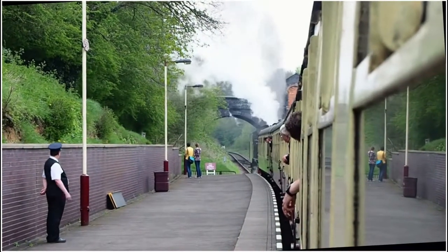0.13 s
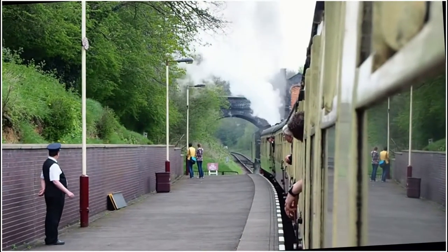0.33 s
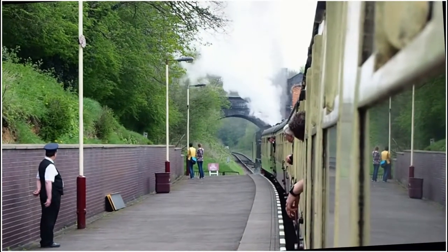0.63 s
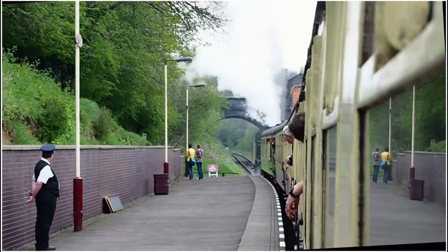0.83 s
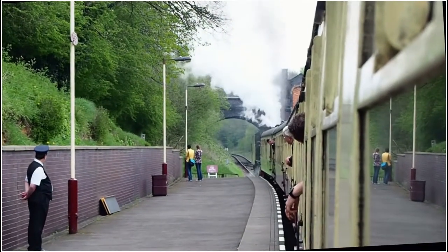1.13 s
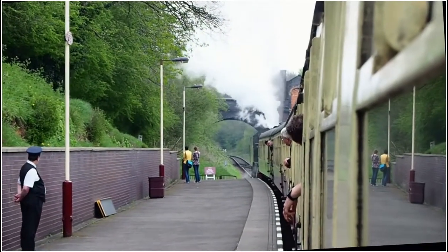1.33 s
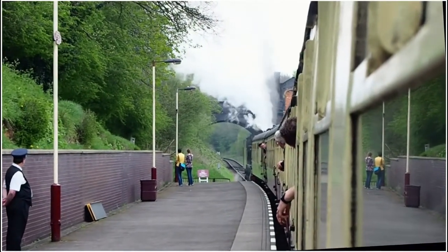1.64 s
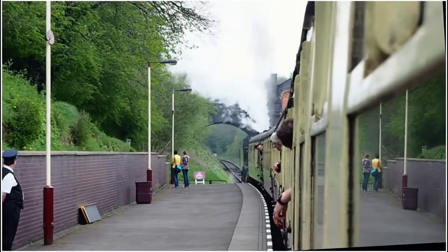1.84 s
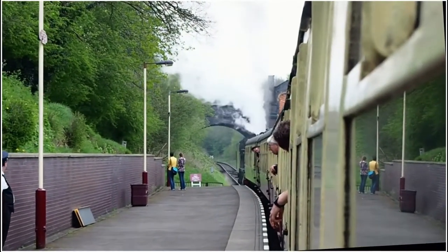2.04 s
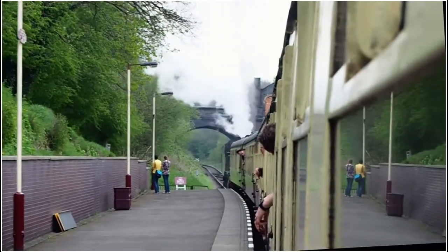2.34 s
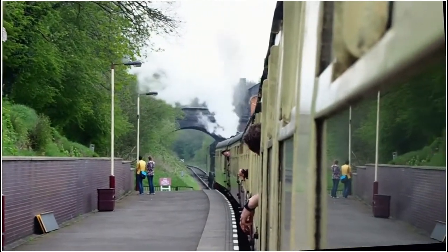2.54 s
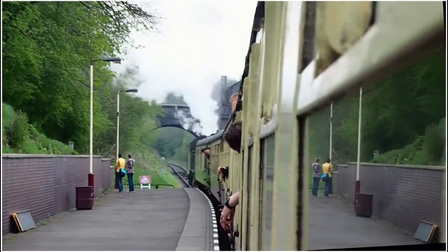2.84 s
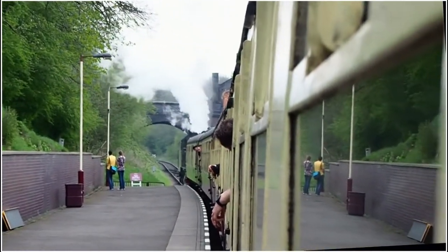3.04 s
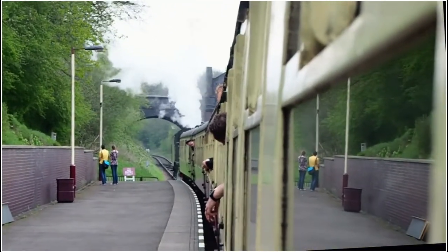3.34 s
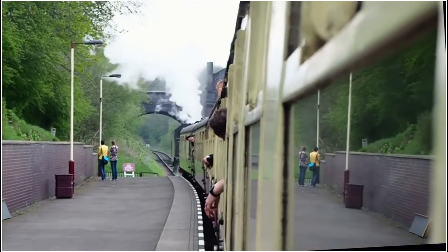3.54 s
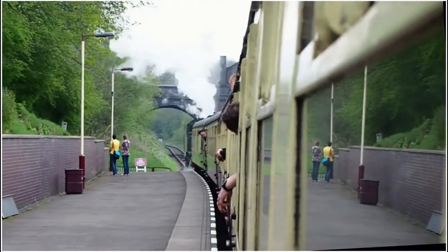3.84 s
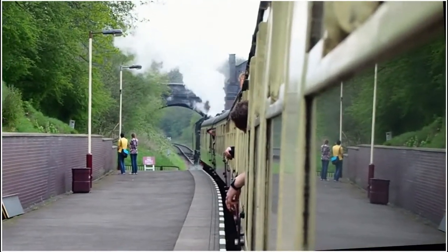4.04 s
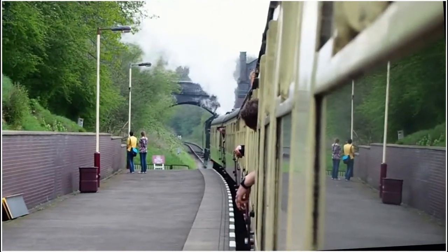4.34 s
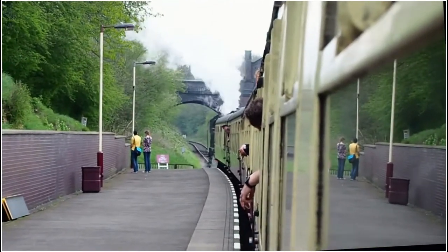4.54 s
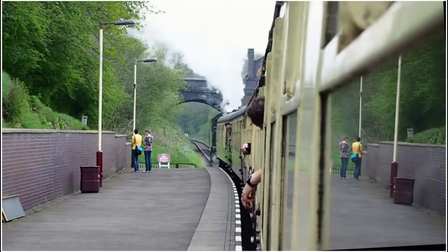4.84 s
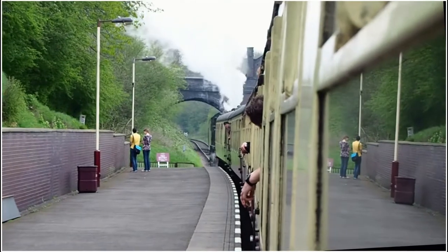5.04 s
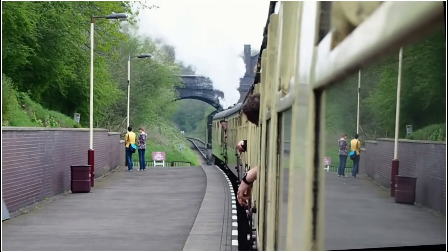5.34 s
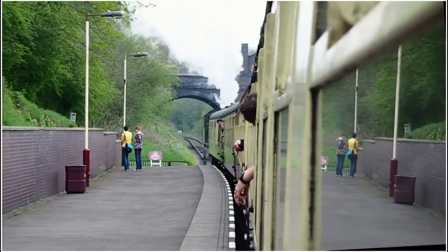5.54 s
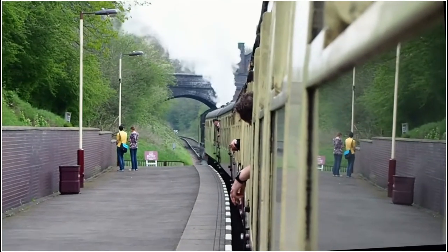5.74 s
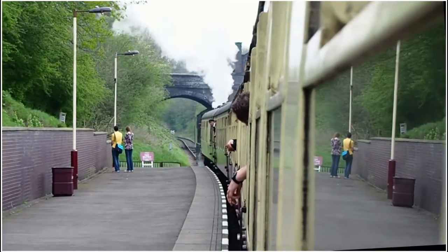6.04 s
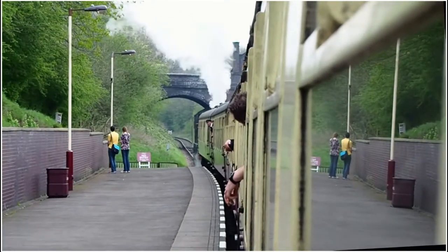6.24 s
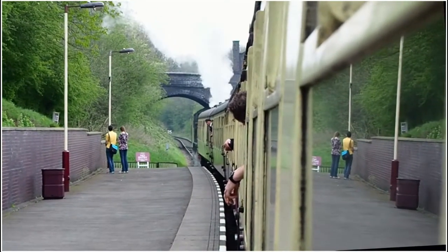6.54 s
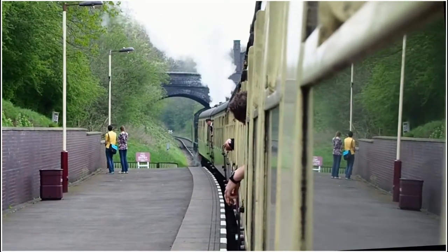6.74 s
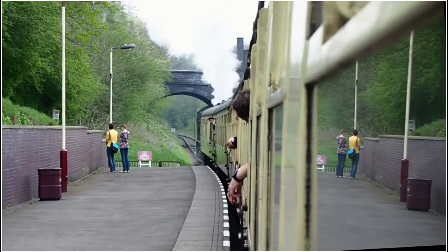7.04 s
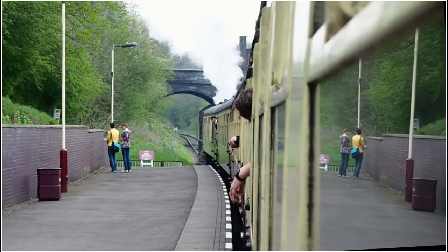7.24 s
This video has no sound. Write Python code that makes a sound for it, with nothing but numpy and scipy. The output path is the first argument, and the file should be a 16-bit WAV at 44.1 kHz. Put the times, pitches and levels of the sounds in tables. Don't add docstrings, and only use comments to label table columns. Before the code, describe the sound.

Outdoors in a railway cutting, a small stereo microphone beside a carriage wall hears a departing steam train. Steady leaking steam forms a high hissing bed over grinding wheels and slowly growing floor rumble. Strong, short exhaust puffs boom and roar, first about eight tenths of a second apart, then quicker and somewhat softer. Metal couplings knock and rattle, a wheel squeals faintly, and everything cuts off mid-motion.

```python
import sys
import numpy as np
from scipy import signal
from scipy.fft import rfft, irfft, next_fast_len
from scipy.io import wavfile
from scipy.ndimage import uniform_filter1d

SR = 44100
rng = np.random.default_rng(int(sys.argv[2]) if len(sys.argv) > 2 else 0)


def magnitude_from_level(level_db):
    exponent = np.asarray(level_db, float) / 20
    return 10 ** exponent


def dump_mix(stems):
    frames = np.atleast_2d(stems).T
    limited = np.clip(frames, -1, 1)
    pcm = np.round(limited * 32767).astype(np.int16)
    wavfile.write(sys.argv[1], SR, pcm)


N = 325899
TIME = np.arange(N) / SR
SIZE = next_fast_len(N + SR)
HZ = np.arange(SIZE // 2 + 1) * SR / SIZE + 1e-3



def on_hz(points):
    return np.interp(np.log(HZ), np.log([p[0] for p in points]), [p[1] for p in points])


def shape(x, response):
    return irfft(rfft(x, SIZE) * response, SIZE)[..., :N]


def unit(x):
    return x / np.sqrt(np.mean(x ** 2))


def resonances(modes):
    total = 0
    for k, (hz, width_hz, db) in enumerate(modes):
        detuning = (HZ / hz - hz / HZ) * hz / width_hz
        total = total + (-1) ** k * magnitude_from_level(db) / (1 + 1j * detuning)
    return total


def walk(rate):
    hold = int(SR / rate)
    steps = np.repeat(rng.standard_normal(N // 100), hold)[:N]
    return 1.3 * uniform_filter1d(uniform_filter1d(steps, hold), hold)


def tone(hz):
    return np.sin(2 * np.pi * np.cumsum(hz) / SR)


def turbulence(response, lo_hz, hi_hz, shared_db, own_db, rate):
    spectrum = rfft(rng.standard_normal((3, SIZE))) * response
    shared, out = walk(rate), 0
    for centre in np.arange(np.log2(lo_hz), np.log2(hi_hz), .5):
        band = np.cos(np.pi * np.clip(np.log2(HZ) - centre, -.5, .5)) ** 2
        flicker = magnitude_from_level(shared_db * shared + own_db * walk(rate))
        out = out + flicker * irfft(spectrum * band, SIZE)[:, :N]
    return unit(out)


def swells(full_s, held_s, peak_db, rise, fall):
    full_s, held_s, peak_db = (np.reshape(v, (-1, 1)) for v in (full_s, held_s, peak_db))
    late = TIME - full_s
    sunk_db = rise * np.maximum(-late, 0) + fall * np.maximum(late - held_s, 0)
    return np.sqrt(np.sum(magnitude_from_level(2 * (peak_db - sunk_db)), axis=0))


# f/Hz, level/dB per Hz
STEAM_COLOUR = [(900, -37), (1400, -26), (1700, -4), (2200, -9.5), (3300, -0.5), (4150, -3), (4800, 0),
                (5700, -5), (6800, -9), (8200, -6.5), (9200, -12), (10200, -11), (14300, -18.5),
                (15800, -38)]
# t/s, level/dB
STEAM_FLOW = [(0.0, -47), (1.15, -47.5), (1.36, -49.5), (2.68, -50), (2.82, -48.5), (3.38, -47.5),
              (4.36, -50), (5.31, -49), (5.43, -47.5), (5.89, -46.5), (6.63, -50), (7.39, -49)]


def leaking_steam():
    hiss = turbulence(magnitude_from_level(on_hz(STEAM_COLOUR)), 1000, 18000, shared_db=0.5, own_db=.5, rate=12)
    flow_db = np.interp(TIME, *np.transpose(STEAM_FLOW))
    return magnitude_from_level(flow_db + 1.34) * hiss


# f/Hz, level/dB per Hz
WHEEL_COLOUR = [(82, -19), (140, -9.5), (254, -7), (363, -12), (405, -6.5), (461, -9.5), (504, -7),
                (922, -3), (999, -2), (1500, -7), (1950, -33), (3300, -120)]
# f/Hz, level/dB per Hz
RUMBLE_COLOUR = [(12, -41), (20, -7), (22, -23), (35, -8), (48, 2.5), (81, 1.5), (150, 0), (200, -30),
                 (330, -120)]
# t/s, rumble level/dB, wheel level/dB
JOLTS = [(.02, -85, -56), (.43, -69, -55.5), (.95, -60, -49.5), (1.07, -54.5, -53), (1.77, -70, -54),
         (2.06, -69, -73), (2.76, -62.5, -55), (3.09, -65, -52), (3.29, -64.5, -69), (3.72, -63, -58.5),
         (4.09, -66, -53), (5.27, -71, -62), (5.95, -67, -60), (6.68, -68, -55.5), (7.08, -59.5, -55),
         (7.36, -64, -56.5)]


def rolling_train():
    jolt_s, thud_db, shudder_db = np.transpose(JOLTS)
    wheels = turbulence(magnitude_from_level(on_hz(WHEEL_COLOUR)), 103.0, 2100, shared_db=1.0, own_db=1.5, rate=9)
    rumble = turbulence(magnitude_from_level(on_hz(RUMBLE_COLOUR)), 27, 210, shared_db=.6, own_db=.4, rate=13)
    shudder = swells(jolt_s, 0, shudder_db, rise=190, fall=38)
    thud = swells(jolt_s, 0, thud_db + 2.2, rise=180, fall=70)
    wheel_level = np.hypot(magnitude_from_level(-56 + 0.21 * TIME), shudder)
    rumble_level = np.hypot(magnitude_from_level(-76.5 + 1.36 * TIME), thud)
    return wheels * wheel_level + rumble * rumble_level


# full at t/s, held t/s, f/Hz, level/dB
WHISTLE = (.012, .03, 785, -60)


def whistle():
    full_s, held_s, hz, db = WHISTLE
    sag_hz_per_s = 70
    pitch = hz - sag_hz_per_s * TIME + 9 * walk(37)
    level = swells(full_s, held_s, db + 4.5, rise=900, fall=60)
    return level * (tone(pitch) + tone(2 * pitch)) * np.array([[1], [.3], [-.3]])


# f/Hz, width f/Hz, level/dB
CHIMNEY = [(182, 29, -2.5), (232, 51, -3.5)]


def chimney_boom():
    response = resonances(CHIMNEY) / (1 + (160 / HZ) ** 12)
    boom = turbulence(response, 110, 600, shared_db=-1.0, own_db=-0.5, rate=30)
    note_hz, sway_hz, sing = 188, 14, .85
    boom[0] += sing * magnitude_from_level(1.3 * walk(40)) * tone(note_hz + sway_hz * walk(30))
    return boom


# f/Hz, width f/Hz, level/dB
BLAST_PIPE = [(340, 77, -7), (504, 110, -9), (620, 67, -1.5), (800, 66, 0.5), (986, 105, -3.5),
              (1216, 76, -1.5), (1500, 300, -13), (1825, 260, -9.5), (2190, 120, -7)]
# f/Hz, starting level/dB re roar, change/dB per s
PIPE_SONG = [(487, -15, 0.1), (625, -14, 1.0), (800, -6, -.8), (1200, -6, -.9)]


def blast_pipe_roar():
    response = resonances(BLAST_PIPE) / (1 + (HZ / 2600) ** 4)
    roar = turbulence(response, 200, 4000, shared_db=.6, own_db=.6, rate=70)
    dull = shape(roar, 1 / (1 + (HZ / 850) ** 6))
    bright_share = np.clip(0.66 - 0.039 * TIME, 0, 1)
    roar = 2 * (1 - bright_share) * dull + 2 * bright_share * (roar - dull)
    for hz, db, db_per_s in PIPE_SONG:
        level = magnitude_from_level(db + db_per_s * TIME + 2.5 * walk(25))
        roar[0] += level * tone(hz + 18 * walk(20))
    return roar


# f/Hz, level/dB per Hz
JET_COLOUR = [(1400, -13), (2000, -8.5), (2600, -0.5), (3300, 1), (4000, -3), (4800, -4), (6000, -12),
              (8000, -12), (12000, -18.5), (15500, -34)]


def jet_hiss():
    return turbulence(magnitude_from_level(on_hz(JET_COLOUR)), 1400, 18000, shared_db=.7, own_db=.6, rate=60)


def cutting_echo(beats):
    t60_s, first_return_s, echo_db = 0.98, .03, -19
    t = np.arange(SR) / SR
    banks = rng.standard_normal((3, SR)) * magnitude_from_level(-60 * t / t60_s) * (t > first_return_s)
    banks = banks / np.sqrt(np.sum(banks[0] ** 2))
    soft_earth = 1 / (1 + 1j * HZ / 3000)
    return magnitude_from_level(echo_db) * shape(beats, rfft(banks, SIZE) * soft_earth)


# valve fully open at t/s, held t/s, roar level/dB, boom level/dB re roar, jet level/dB re roar
BEATS = [(0.395, 0.023, -40.5, -3.5, -3.5), (1.231, 0.033, -39, -2.5, -2), (1.99, 0.019, -42, -2.7, 1),
         (2.696, 0.054, -43.3, -5.5, -2.5), (3.409, 0.028, -46, -2.5, 2.2), (4.068, 0.04, -43, -3.5, -2.5),
         (4.681, 0.029, -44.5, 0.1, -1.5), (5.27, 0.039, -46, -2.5, -1.5), (5.889, 0.012, -45, -2.4, -0.3),
         (6.473, 0.028, -44.5, -1.5, -0.5), (7.016, 0.017, -45, -3.5, -2)]


def exhaust():
    open_s, held_s, roar_db, boom_db, jet_db = np.transpose(BEATS)
    boom = swells(open_s, held_s, roar_db + boom_db - .1, rise=510, fall=257) * chimney_boom()
    roar = swells(open_s, held_s, roar_db + 0.085, rise=410, fall=167) * blast_pipe_roar()
    jet = swells(open_s, held_s, roar_db + jet_db + 2.5, rise=370, fall=150) * jet_hiss()
    focus = np.array([[1], [.45], [.45]])
    beats = focus * (roar + boom) + jet
    return beats * np.array([[1.1], [.7], [.7]]) + cutting_echo(beats)


# t/s, knock level/dB, ring f/Hz, second ring f/Hz, rattle level/dB re knock
CLANKS = [(.890, -45, 905, 1390, -1.5), (0.9248, -29.5, 466, 1280, -9), (.940, -46, 1170, 600, 5),
          (.966, -50, 910, 1500, 3.5), (1.060, -52.5, 199, 353, 2.5), (1.765, -47.5, 800, 1090, 0.5),
          (2.735, -42.5, 900, 1640, 1), (3.108, -30, 2520, 3500, -20), (3.117, -35, 1600, 1050, -15),
          (3.133, -41, 1080, 890, -7.5), (3.198, -47, 800, 1550, -1.5), (3.248, -39.5, 1160, 710, -11),
          (3.960, -50, 520, 704, 0), (3.985, -38, 467, 303, -5.5), (3.979, -50, 1920, 1300, 2.5),
          (3.998, -48.5, 603, 1000, 5), (5.248, -46.5, 620, 800, 1)]


def couplings():
    out, t = np.zeros((3, N + SR)), np.arange(SR // 2) / SR
    for clank_s, db, hz, second_hz, rattle_db in CLANKS:
        i = int(clank_s * SR)
        span = slice(i, i + len(t))
        ring = np.sin(2 * np.pi * hz * t) + .5 * np.sin(2 * np.pi * second_hz * t)
        out[0, span] += magnitude_from_level(db) * ring * magnitude_from_level(-60 * t / 0.036) * (1 - np.exp(-t / 0.0015))
        knocks = rng.standard_normal((3, len(t))) * magnitude_from_level(1.0 * walk(147)[:len(t)])
        loose = sum(signal.lfilter(*signal.iirpeak(f, 1.8, SR), knocks) for f in (hz, second_hz))
        lowpass = signal.butter(2, 1.3 * max(hz, second_hz), fs=SR, output="sos")
        loose = unit(signal.sosfilt(lowpass, loose))
        t60_s = 0.32 * magnitude_from_level(0.82 * rattle_db)
        level = magnitude_from_level(db + rattle_db - 60 * t / t60_s) * (1 - np.exp(-t / 0.0031))
        out[:, span] += level * loose * np.array([[1], [1.4], [1.4]])
    return out[:, :N]


# full at t/s, held t/s, f/Hz, level/dB
FLANGE = [
    (5.35, 0.16, 1213, -60),
    (5.63, .05, 1128, -59),
]


def flange():
    waver_hz, squeal = 5 * walk(40), 0
    for full_s, held_s, hz, db in FLANGE:
        squeal = squeal + swells(full_s, held_s, db + 2.5, rise=350, fall=380) * tone(hz + waver_hz)
    return squeal * np.array([[.9], [1.2], [-1.2]])


# f/Hz, share 0-1
SCATTER = [(60, 0.18), (140, 0.02), (500, 0.05), (900, 0.11), (1300, 0.13), (1600, 0.61), (2200, 0.76),
           (3200, 0.38), (4100, 0.66), (4800, 0.21), (6800, 1), (8200, 0.72), (9200, 1), (11500, 0.58)]
# f/Hz, lead/radians
LEAD = [(60, 0), (300, -.1), (1200, -0.35), (1500, 1), (2100, -1.5), (2400, 0.56), (3600, 0.38),
        (4000, -0.2), (4300, 1.63), (6200, -0.5), (7750, 1.6), (8400, 3), (9470, 6.5), (11400, 12),
        (13500, 19)]
# f/Hz, left minus right level/dB
SHADE = [(150, -0.6), (500, -0.8), (1400, 1), (2250, -7.5), (3200, -5.5), (4200, -6.5), (5200, -1.5),
         (6000, -4), (6800, -4.5), (8200, 3.5), (9200, 1), (10000, -2.5), (11000, 4.5), (15000, -3)]


def ports(sound):
    share = np.clip(on_hz(SCATTER), 0, 1)
    left_lead = np.exp(1j * np.outer([1, 0], on_hz(LEAD)))
    direct = shape(sound[0], np.sqrt(1 - share) * left_lead)
    scattered = shape(sound[1:], np.sqrt(share))
    return shape(direct + scattered, magnitude_from_level(np.outer([.5, -.5], on_hz(SHADE))))


def scene():
    train = leaking_steam() + rolling_train() + whistle()
    return ports(train + exhaust() + couplings() + flange())


def low_pass(x):
    return signal.sosfilt(signal.butter(12, 15760, fs=SR, output="sos"), x)


def record(dry):
    return low_pass(dry)


dry = scene()
out = record(dry)
dump_mix(out)
```